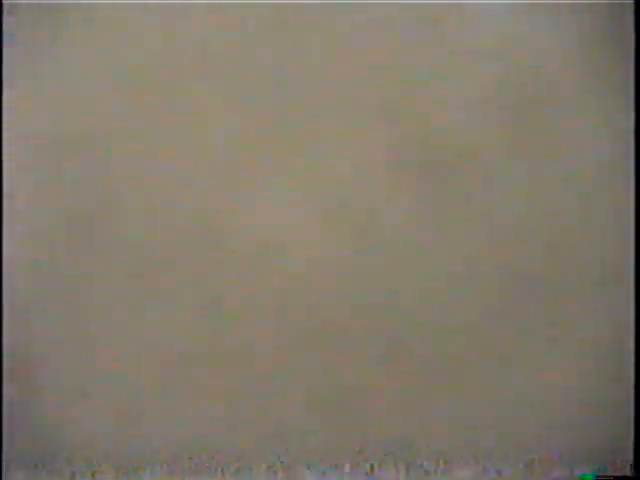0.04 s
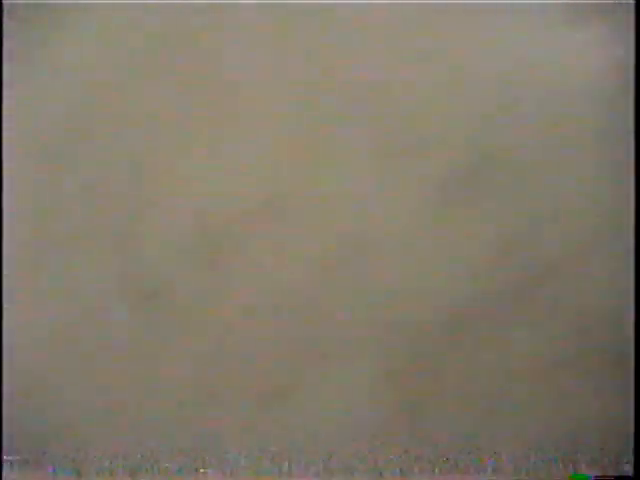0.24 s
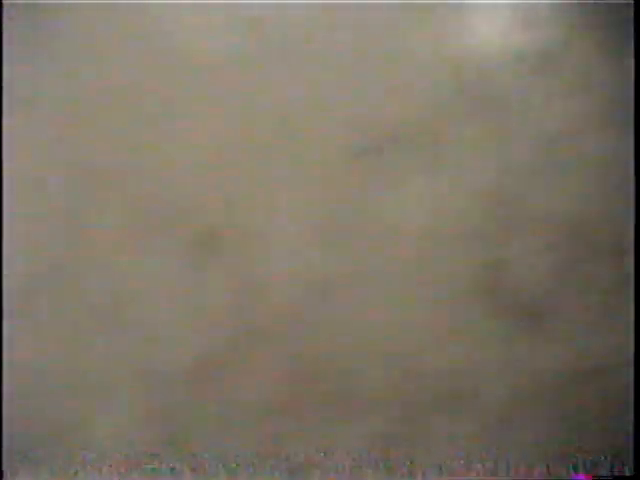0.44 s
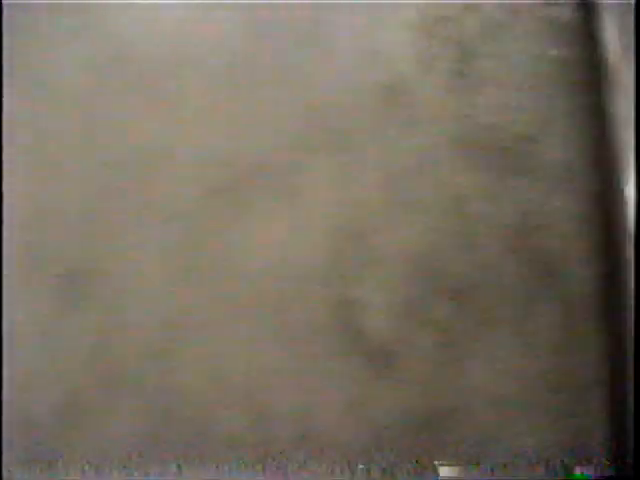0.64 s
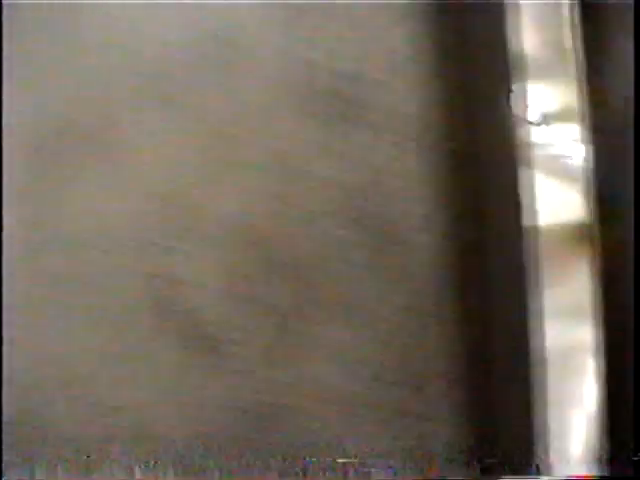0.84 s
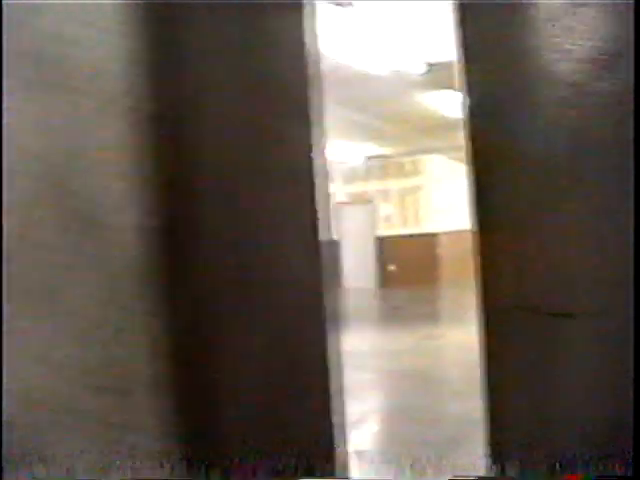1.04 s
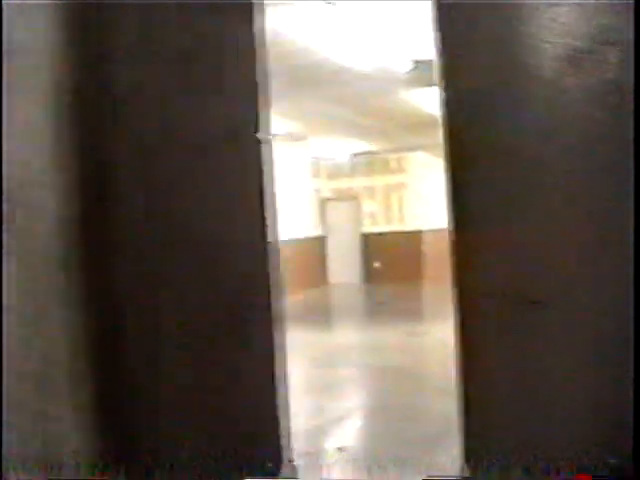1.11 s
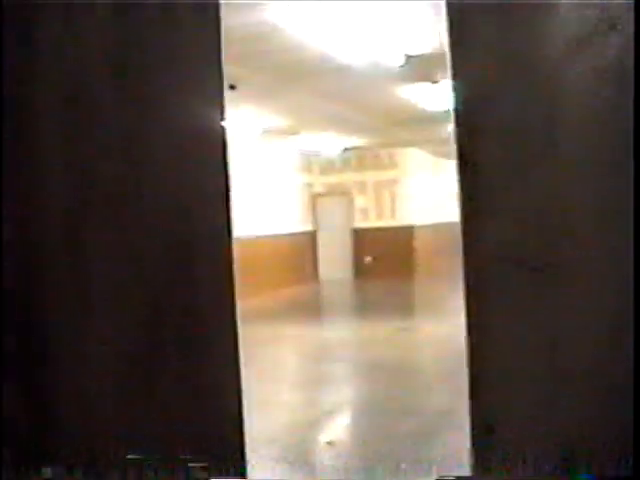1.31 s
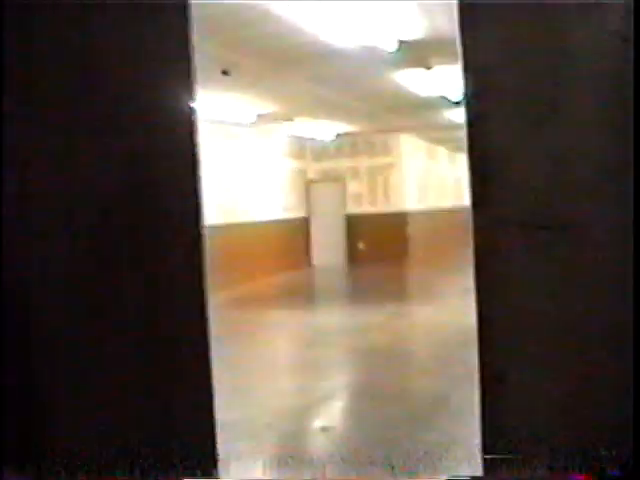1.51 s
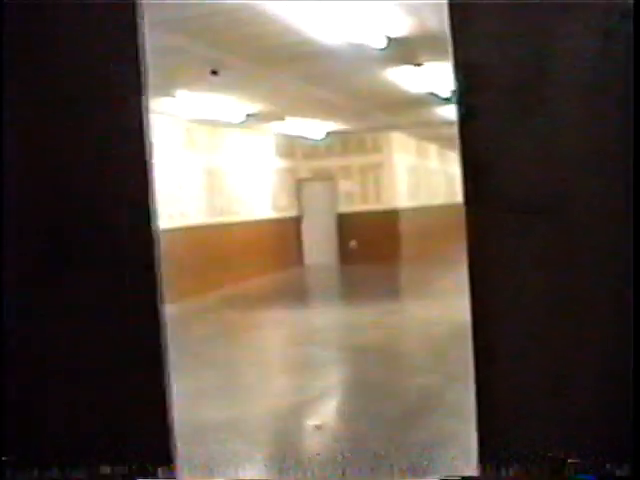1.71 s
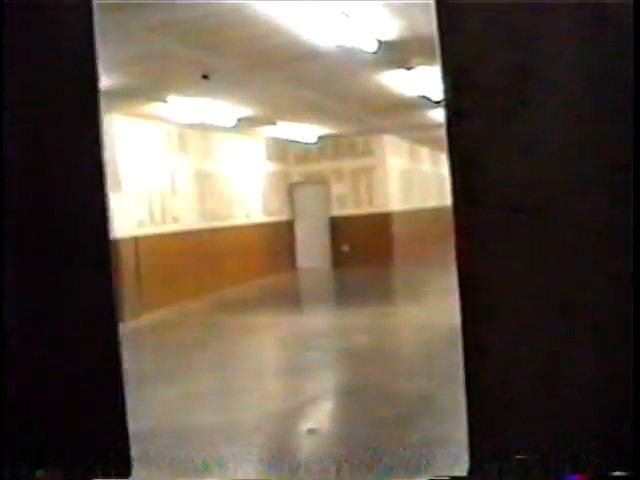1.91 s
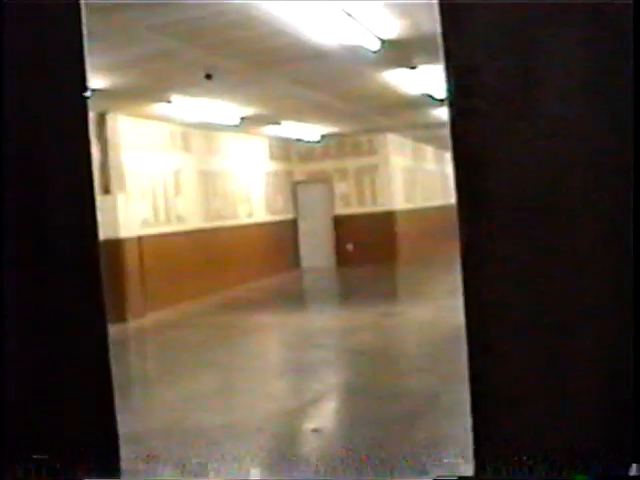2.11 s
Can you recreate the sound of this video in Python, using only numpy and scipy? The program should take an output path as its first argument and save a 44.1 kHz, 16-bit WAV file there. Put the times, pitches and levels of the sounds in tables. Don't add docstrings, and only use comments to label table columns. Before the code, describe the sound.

A heavy push-bar door is unlatched with rattling metal clacks and a hard clunk, then hums quietly

```python
import sys
import numpy as np
from scipy import signal
from scipy.fft import rfft, irfft, next_fast_len
from scipy.io import wavfile
from scipy.ndimage import uniform_filter1d

SR = 44100
rng = np.random.default_rng(int(sys.argv[2]) if len(sys.argv) > 2 else 0)


def digitize_waveform(pressure):
    field = np.atleast_2d(pressure).T
    bounded = np.clip(field, -1, 1)
    quanta = np.round(bounded * 32767).astype(np.int16)
    wavfile.write(sys.argv[1], SR, quanta)


def convert_level_to_amplitude(level_db):
    exponent = np.asarray(level_db, float) / 20
    return 10 ** exponent


N = 94815

# hz, density_db_per_hz
AIR_SPECTRUM = [(25, -6.5), (50, 0.5), (120, -2.5), (220, 2.5), (500, -6.5), (1100, -14.5), (3900, -22.5),
                (13500, -32)]
# time_s, level_db
AIR_LEVEL_CURVE = [(0, -41.5), (.35, -36.5), (.75, -42.5), (1.101, -43), (1.35, -44), (2.15, -44)]
# centre_hz, width_hz, level_db
DUCT_PEAKS = [(97.1, 7.7, -50.5), (148.9, 7.3, -56), (2770, 1140, -60.5), (3940, 610, -59),
              (10900, 440, -68), (6760, 810, -68.5), (7800, 200, -75), (712, 37, -68)]
BALLAST_HARMONICS = {1: -77, 3: -72, 4: -62, 10: -61, 12: -63, 14: -67.5, 16: -68.5, 20: -70, 30: -84, 32:
                     -69.5, 34: -71, 36: -71, 44: -78.5, 46: -68, 48: -82, 52: -72, 197: -76}
# start_s, level_db, contact_s, t60_s, centre_hz
LEAF_KNOCKS = [(.03, -42, 0.021, 0.3, 268), (.118, -35.5, 0.014, 0.12, 510),
               (.165, -27.5, 0.0083, 0.31, 550), (.222, -22, 0.0099, 0.033, 500),
               (.245, -24.5, 0.0093, 0.18, 456), (.375, -15.5, 0.019, 0.03, 556),
               (.399, -20, 0.012, 0.25, 480), (.44, -22.5, 0.0096, 0.11, 400),
               (.483, -35, 0.0084, 0.061, 327), (.572, -28, 0.018, 0.069, 630),
               (.61, -40.5, 0.053, 0.052, 273), (.66, -36, 0.0035, 0.043, 166.4),
               (.846, -48, 0.01, 0.068, 322), (1.09, -48, 0.053, 0.09, 190)]
# centre_hz, width_hz, level_db
LEAF_MODES = [(314.8, 12.5, 2.5), (271, 22, 2.5), (357, 8.3, -27), (456.3, 23, 4.5), (590, 27, -6),
              (727, 85, 0.5), (880, 25, -31), (93, 56, 1)]
# start_s, level_db, contact_s, t60_s, centre_hz
BAR_CLACKS = [(.0955, -40, 0.0039, 0.077, 2040), (.113, -44, 0.007, 0.082, 2050),
              (.159, -36, 0.034, 0.058, 2080), (.209, -26, 0.003, 0.074, 1770),
              (.2225, -19, 0.0018, 0.1, 1920), (.238, -22, 0.012, 0.053, 2800),
              (.267, -24.5, 0.004, 0.075, 2830), (.297, -30, 0.0025, 0.046, 3370),
              (.359, -25, 0.018, 0.036, 1170), (.363, -31, 0.021, 0.015, 1830),
              (.377, -18.5, 0.014, 0.085, 3560), (.438, -27, 0.012, 0.065, 3620),
              (.4555, -20, 0.0064, 0.057, 3120), (.485, -30.5, 0.008, 0.051, 2640),
              (.5405, -39.5, 0.0031, 0.21, 3500), (.569, -32, 0.015, 0.11, 1510),
              (.573, -27.5, 0.0033, 0.056, 2930), (.655, -31, 0.0023, 0.074, 1780),
              (.8345, -32, 0.009, 0.045, 3100), (.9, -53.5, 0.12, 0.27, 2620),
              (1.245, -60, 0.0033, .04, 2800), (.422, -38.5, 0.018, 0.033, 4540)]
# centre_hz, width_hz, level_db
BAR_MODES = [(2140, 59, -3), (3164, 230, 25.5), (3700, 120, 5), (4580, 120, -15)]
# start_s, pitch_hz, peak_db,
# t60_s
CLEAN_RINGS = [(.096, 2120, -39, .02), (.118, 590, -34, .03), (.125, 307, -26, .07), (.125, 680, -30, .05),
               (0.165, 1170, -29.5, 0.046), (0.175, 544, -24.5, 0.066), (.1745, 1680, -27, .02),
               (0.209, 1320, -15, .04), (.21, 2050, -22, .04), (.2235, 572, -16, .04),
               (0.2232, 1049, -13.5, .07), (0.2244, 1420, -14, .035), (.224, 2850, -20, .03),
               (.228, 370, -16, .1), (.2405, 3563, -13, .05), (0.2398, 3060, -14.5, .06),
               (.241, 2070, -23, .05), (.248, 3410, -18, .03), (.255, 4040, -22, .02),
               (.2675, 3530, -28, .03), (.268, 379, -29.5, .07), (.27, 615, -28, .07),
               (.297, 3690, -32.5, .04),
               (0.3754, 340, -1, .04), (0.3754, 413, -7, .05), (.378, 748, -11, .06), (.39, 765, -10, .07),
               (.3885, 335, -9, .03), (.419, 300, -12, .07), (.386, 606, -15, .05), (0.389, 437, -11, .05),
               (.389, 880, -11.5, .06), (.4, 291.7, -6, .12), (.401, 444, -7, .08), (.401, 590, -12, 0.074),
               (.396, 1315, -17.5, .06), (0.395, 1075, -14, 0.055), (.447, 495, -21, .04),
               (0.382, 8920, -5.5, .04), (.388, 9140, -8.5, .043), (0.436, 285, -12, .07),
               (.459, 1050, -16, .05), (.46, 1535, -21.5, .09), (.459, 3280, -16, .04),
               (.459, 2820, -23.5, .04), (.576, 440, -20.5, .02), (.583, 397, -21, 0.043),
               (.578, 1083, -28, .05), (0.577, 1626, -27, .04), (.577, 3180, -24.5, .04),
               (.589, 274, -20, .06), (.661, 1840, -25.5, 0.022), (.656, 1240, -32, 0.037),
               (.6555, 1620, -24.5, .03), (.66, 2600, -29, .03), (.657, 910, -30, .04),
               (.8385, 900, -27, .025), (.845, 850, -32, .03), (.843, 5440, -33, .015),
               (1.4235, 1550, -33, .012), (.838, 2910, -29, 0.037), (1.428, 5900, -41, .01)]
# start_s, level_db, contact_s, t60_s, centre_hz
LATCH_TICKS = [(.097, -51.5, .003, 0.12, 6800), (.165, -43.5, 0.012, 0.24, 6500),
               (.209, -31, 0.0017, 0.012, 9900), (.2375, -29, 0.01, 0.064, 8400),
               (.267, -28.5, 0.0014, 0.016, 7400), (.296, -34.5, 0.0036, 0.034, 8150),
               (.363, -46, 0.016, .04, 8500), (.374, -22, 0.019, 0.075, 9300),
               (.438, -35.5, 0.0082, 0.034, 8360), (.456, -28, 0.0092, 0.041, 6400),
               (.485, -45, 0.0069, 0.046, 9200), (.5395, -31, 0.0025, 0.055, 9350),
               (.575, -39, 0.0047, 0.072, 5270), (.617, -43, 0.0027, 0.022, 6500),
               (.63, -46.5, 0.0099, 0.045, 6600), (.655, -37.5, 0.0021, 0.049, 6500),
               (.833, -40, 0.0049, 0.062, 9900), (.836, -38.5, 0.0066, 0.075, 5700),
               (1.175, -55.5, .004, 0.045, 8900), (1.423, -51.5, 0.004, 0.014, 9050),
               (.398, -37, 0.0056, 0.045, 7800)]
# centre_hz, width_hz, level_db
LATCH_MODES = [(6500, 340, 15), (7750, 180, -17), (9400, 280, -10)]
# start_s, level_db, contact_s, t60_s, centre_hz
DOOR_THUMPS = [
    (.17, -38, 0.084, 0.17, 74),
    (.24, -36, 0.03, 0.22, 122),
    (.376, -27, 0.039, 0.2, 70),
    (.5, -39, 0.076, 0.33, 68.6),
    (.59, -60, 0.037, 0.16, 60.4),
]
CREAK_PARTIALS = [-27, -28.5]
LOUD_CUT_SHIFT_HZ = [
    [-150],
    [450],
]

SCATTER_DB = 3


def rms_one(x):
    return x / np.sqrt(np.mean(x ** 2) + 1e-20)


def drift(rate_hz):
    step = 40
    r = np.exp(-2 * np.pi * step * rate_hz / SR)
    noise = rng.standard_normal(N // step + 2002)
    slow = signal.lfilter([1], [1, -2 * r, r * r], noise)[2000:]
    return np.interp(np.arange(N) / step, np.arange(len(slow)), rms_one(slow))


def resonance(x, hz, width_hz):
    r = np.exp(-np.pi * width_hz / SR)
    poles = [1, -2 * r * np.cos(2 * np.pi * hz / SR), r * r]
    return signal.lfilter([(1 - r * r) / 2, 0, (r * r - 1) / 2], poles, x + 1e-18)


def ducts():
    out = np.zeros(N)
    for hz, width_hz, db in DUCT_PEAKS:
        noise = rng.standard_normal(N + SR)
        once = resonance(noise, hz, width_hz)
        out += convert_level_to_amplitude(db) * rms_one(resonance(once, hz, width_hz)[SR:])
    return out


def air():
    out = np.zeros(N)
    edges_hz = 20 * 2 ** np.arange(0, 10, .5)
    white = rng.standard_normal((2, N + SR))
    hz, db = np.transpose(AIR_SPECTRUM)
    for k, (low, high) in enumerate(zip(edges_hz, edges_hz[1:])):
        sos = signal.butter(2, [low, high], "band", fs=SR, output="sos")
        band = signal.sosfilt(sos, white[k % 2])[SR:]
        band_db = np.interp(np.log(low * high) / 2, np.log(hz), db)
        out += band * convert_level_to_amplitude(band_db + 1.4 * drift(16))
    time_s, level_db = np.transpose(AIR_LEVEL_CURVE)
    level = convert_level_to_amplitude(np.interp(np.arange(N) / SR, time_s, level_db))
    return level * rms_one(out) + ducts()


def ballasts():
    mains_hz = 59.94
    t = np.arange(N) / SR
    out = np.zeros(N)
    for k, db in BALLAST_HARMONICS.items():
        level = np.sqrt(2) * convert_level_to_amplitude(db + SCATTER_DB * drift(1.0))
        out += level * np.sin(2 * np.pi * (k * mains_hz * t + rng.random()))
    return out


def struck(rows, body, spread, broad_db, modes_db, rise):
    grain_db = 3
    out = np.zeros(N + SR)
    t = np.arange(SR // 3) / SR
    size = (len(rows), len(t))
    grit = rng.standard_normal(size) * convert_level_to_amplitude(grain_db * rng.standard_normal(size))
    luck = convert_level_to_amplitude(SCATTER_DB * rng.standard_normal((len(rows), 16)))
    for (start_s, db, contact_s, t60_s, hz), clicks, mode_luck in zip(rows, grit, luck):
        swell = np.minimum(t / (rise * contact_s), 1)
        shape = swell * convert_level_to_amplitude(-60 * np.maximum(t - contact_s, 0) / t60_s)
        dull = np.exp(-2 * np.pi * 0.65 * hz / SR)
        wide = resonance(shape * clicks, hz, 2 * spread * hz)
        wide = signal.lfilter([1 - dull], [1, -dull], wide)
        near = resonance(wide, hz, spread * hz)
        rung = np.zeros(len(t))
        for k, (mode_hz, width_hz, mode_db) in enumerate(body):
            gain = convert_level_to_amplitude(mode_db) * mode_luck[k] * np.sqrt(hz / width_hz) * (-1) ** k
            rung += gain * resonance(near, mode_hz, width_hz)
        blow = near + convert_level_to_amplitude(modes_db) * rung + convert_level_to_amplitude(broad_db) * wide
        blow *= np.sqrt(np.sum(shape ** 2) / np.sum(blow ** 2))
        i = int(start_s * SR)
        out[i:i + len(t)] += convert_level_to_amplitude(db) * blow
    return out[:N]


def knocks():
    return struck(LEAF_KNOCKS, LEAF_MODES, spread=1.07, broad_db=-6, modes_db=-6.5, rise=0.11)


def hall(x):
    t60_s, cut_hz = 0.29, 3300
    size = next_fast_len(N + SR)
    w = 2 * np.pi * np.fft.rfftfreq(size)
    dull = 1 / (1 + 1j * w * SR / (2 * np.pi * cut_hz))
    response = 0
    for k, delay_s in enumerate(rng.uniform(.011, .04, 10)):
        loop = convert_level_to_amplitude(-60 * delay_s / t60_s) * dull * np.exp(-1j * w * delay_s * SR)
        response = response + loop / (1 - loop) * (-1) ** k
    return irfft(rfft(x, size) * response, size)[:N]


def clacks():
    return struck(BAR_CLACKS, BAR_MODES, spread=0.66, broad_db=10, modes_db=-20, rise=0.2)


def rings():
    max_cycles, rise_cycles = 140, 0.91
    out = np.zeros(N)
    for start_s, hz, db, t60_s in CLEAN_RINGS:
        t = np.maximum(np.arange(N) / SR - start_s, 0)
        decay = convert_level_to_amplitude(db - 60 * t / min(t60_s, max_cycles / hz))
        out += decay * np.sin(2 * np.pi * hz * t) * np.minimum(t * hz / rise_cycles, 1)
    return out


def ticks():
    return struck(LATCH_TICKS, LATCH_MODES, spread=0.22, broad_db=9, modes_db=-20, rise=0.15)


def thumps():
    return struck(DOOR_THUMPS, [], spread=1.58, broad_db=-40, modes_db=0, rise=0.35)


def creak():
    start_s, slip_hz, width_s = 1.425, 600, .0022
    t = np.arange(N) / SR - start_s
    swell = np.exp(-(t / (width_s * np.where(t > 0, 1.3, .8))) ** 2)
    slips = sum(convert_level_to_amplitude(db) * np.cos(2 * np.pi * (k + 1) * slip_hz * t) for k, db in enumerate(CREAK_PARTIALS))
    return swell * slips


def scene():
    mic_roll_off_hz, hall_db = 14600, -22
    door = knocks() + clacks() + rings() + ticks() + thumps() + creak()
    door = signal.sosfilt(signal.butter(2, mic_roll_off_hz, fs=SR, output="sos"), door)
    mono = door + convert_level_to_amplitude(hall_db) * hall(door) + air() + ballasts()
    return np.array([mono, mono])


def roll_off(x):
    return signal.sosfilt(signal.butter(12, 14190, fs=SR, output="sos"), x)


def record(dry):
    track_db = np.array([[-1.6], [1.4]])
    cut_hz, late_cut_hz = np.array([[13230], [13760]]), 13000
    cut_change_s, loud_db = 1.445, -30
    x = dry * convert_level_to_amplitude(track_db)
    x = .7 * np.tanh(x / 0.74) + convert_level_to_amplitude(-85) * rng.standard_normal(x.shape)
    size = next_fast_len(N + SR // 10)
    hz = np.fft.rfftfreq(size, 1 / SR)
    spectrum = rfft(x, size)

    def top_cut(top_hz):
        return irfft(spectrum * np.clip((top_hz - hz) / 250, 0, 1) ** 2, size)[:, :N]

    low = top_cut(late_cut_hz)
    usual = top_cut(cut_hz)
    wide = top_cut(cut_hz + LOUD_CUT_SHIFT_HZ)
    early = np.clip((cut_change_s - np.arange(N) / SR) / .012, 0, 1)
    power = uniform_filter1d(np.diff(low[1], prepend=0) ** 2, size=500)
    loud = uniform_filter1d(1. * (power > convert_level_to_amplitude(2 * loud_db)), size=500)
    offset = [[.0002], [.0072]]
    mix = low + early * (usual - low) + loud * (wide - usual) + offset
    return roll_off(mix)


dry = scene()
out = record(dry)
digitize_waveform(out)
```